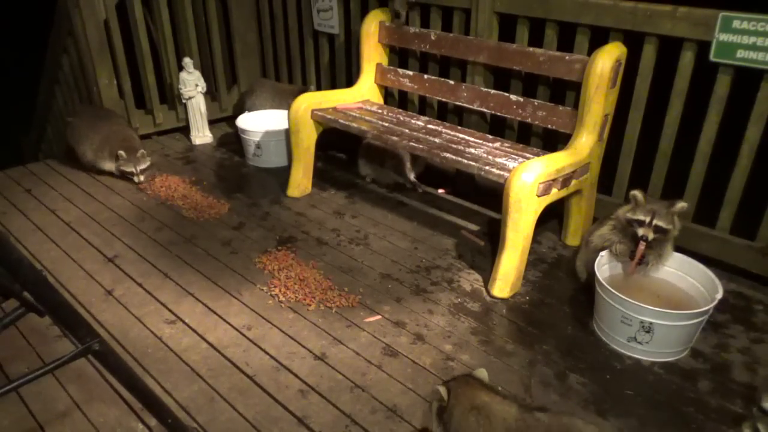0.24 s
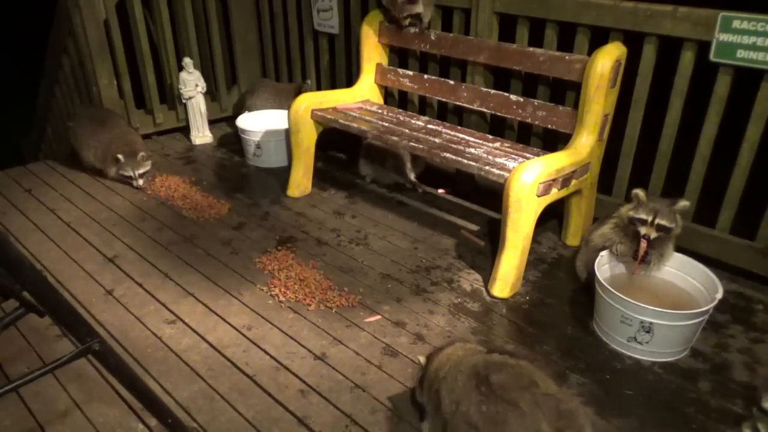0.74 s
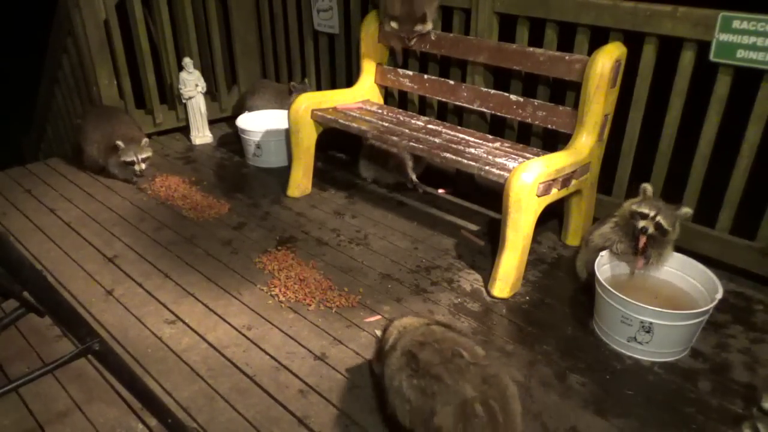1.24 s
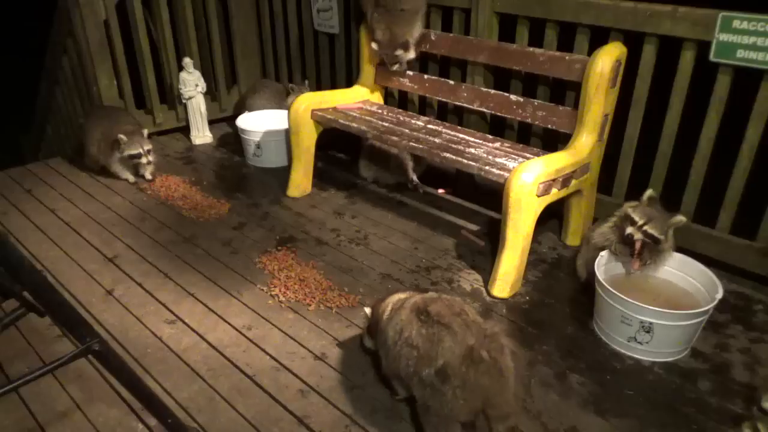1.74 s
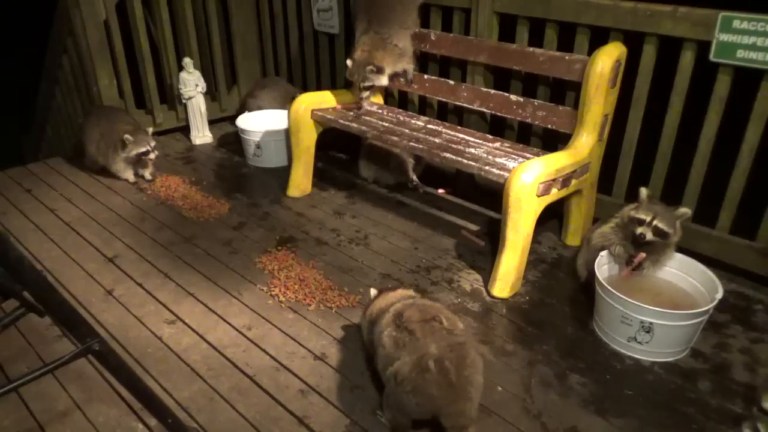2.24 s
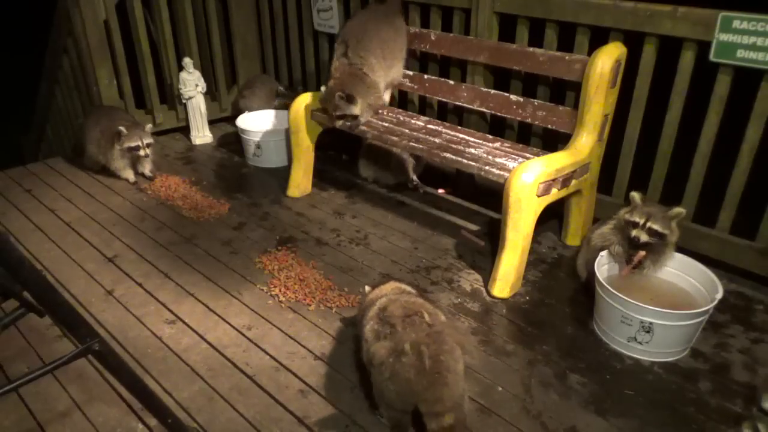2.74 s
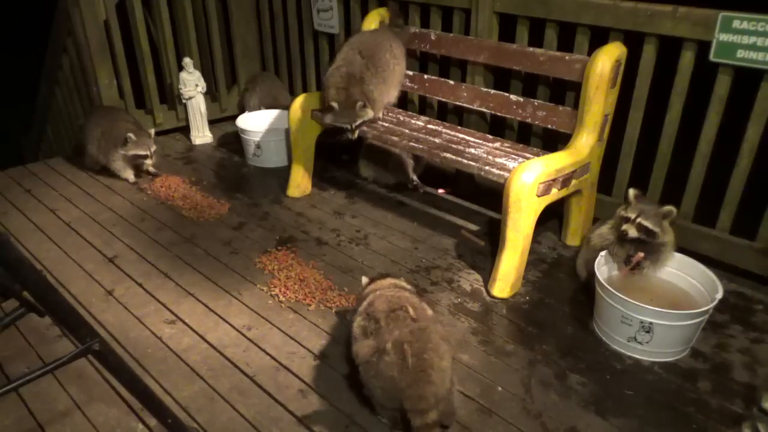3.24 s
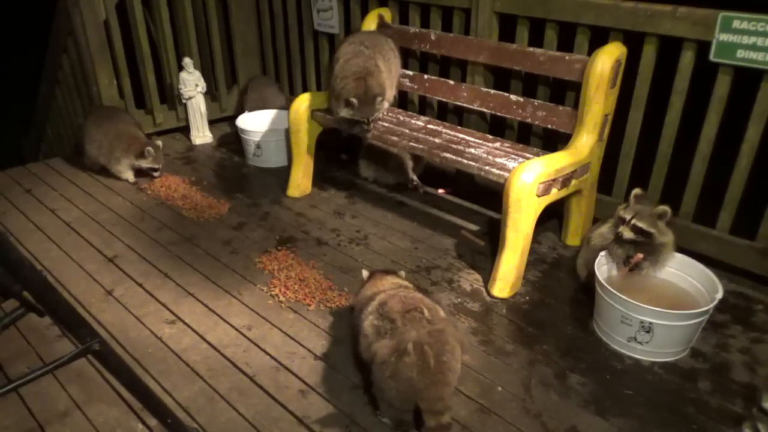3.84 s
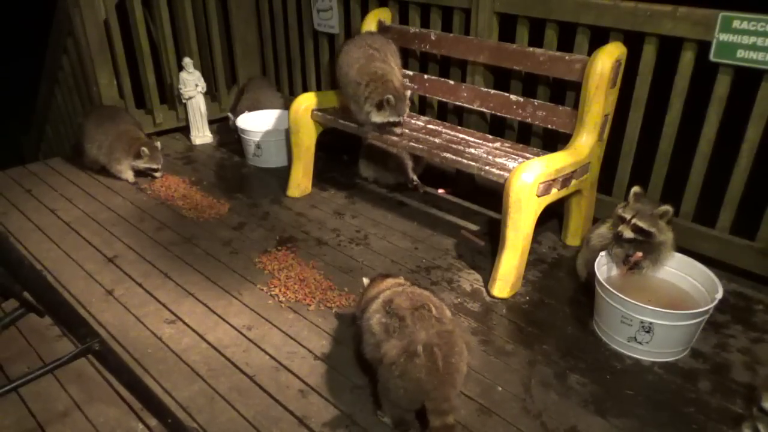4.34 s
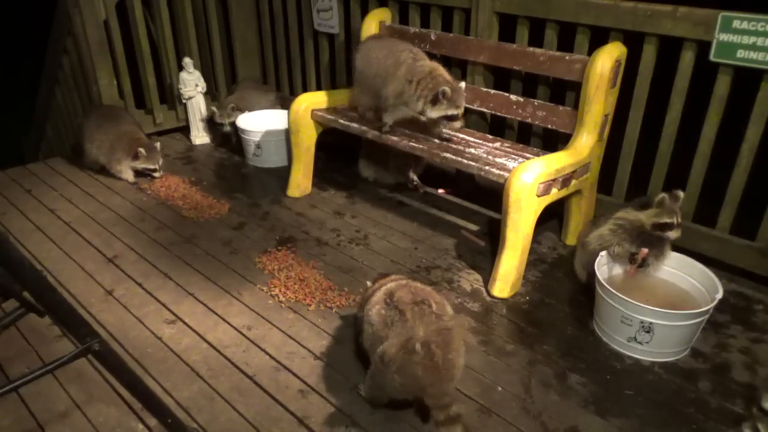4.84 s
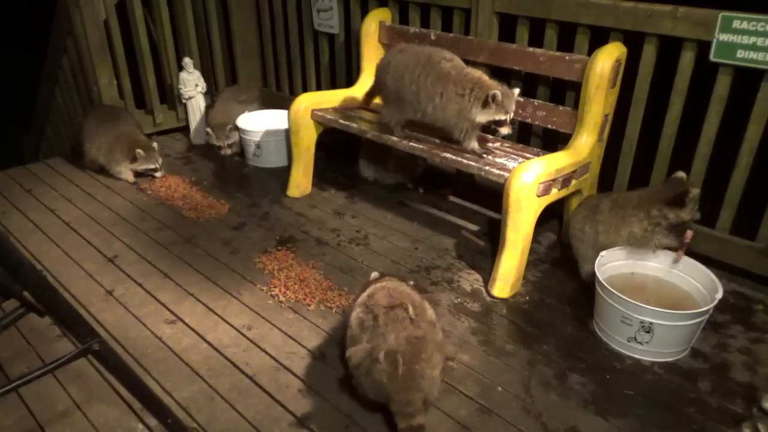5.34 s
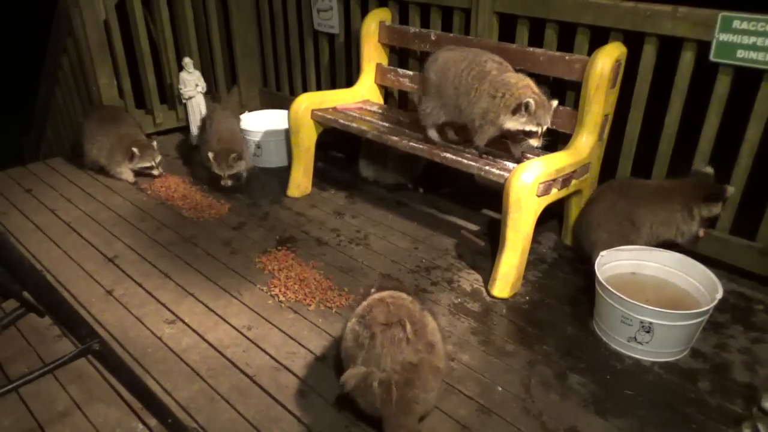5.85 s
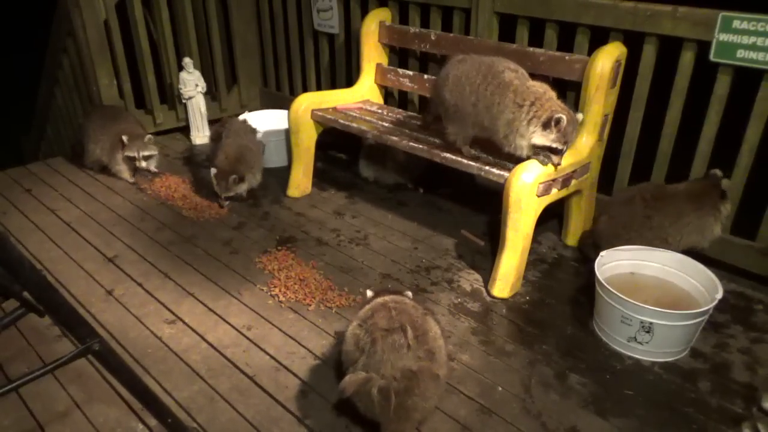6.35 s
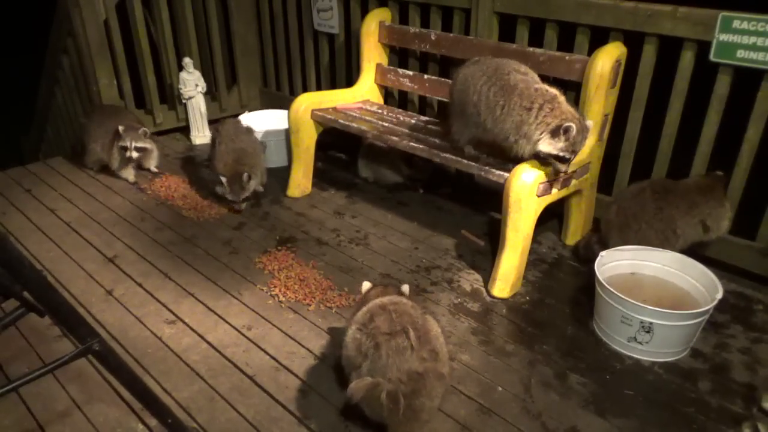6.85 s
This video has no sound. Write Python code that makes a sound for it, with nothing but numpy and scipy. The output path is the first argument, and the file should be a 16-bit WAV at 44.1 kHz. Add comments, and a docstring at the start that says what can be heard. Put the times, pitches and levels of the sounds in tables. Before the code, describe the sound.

A hard clattering burst, then sparse crisp pellet cracks, a woody thump and sliding claws, over soft animal rustling and quiet night hiss.

```python
"""A wooden deck at night: raccoons crack dry pellets close to two microphones.
Something rattles hard, a dense shower of impacts over a boom; pellets snap and ring, and blows ring the wood.
A paw slides down a bench by stick and slip, boards groan as wavering hum and noise, joists bounce softly,
chewing smacks and a few low knocks are soft puffs of noise, and slips squeak as stacks of overtones.
Behind it lie the rustle of many animals and the soft hiss of the night, both made of random spectra."""
import sys
import numpy as np
from scipy import signal
from scipy.fft import rfft, irfft
from scipy.io import wavfile
from scipy.ndimage import uniform_filter1d

SR = 44100
rng = np.random.default_rng(int(sys.argv[2]) if len(sys.argv) > 2 else 0)


def transcribe(signal):
    """Save signal, clipped to [-1, 1], as a 16-bit WAV file at the path in sys.argv[1]."""
    frames = np.atleast_2d(signal).T
    limited = np.clip(frames, -1, 1)
    pcm = np.round(limited * 32767).astype(np.int16)
    wavfile.write(sys.argv[1], SR, pcm)


N = 313110  # length of the scene in samples


def gain_of(db):
    """Turns decibels into an amplitude factor."""
    return 10 ** (np.asarray(db) / 20)


def evened(x):
    """Scales a sound to an RMS of 1."""
    return x / np.sqrt(np.mean(x ** 2) + 1e-20)


def peaked(x):
    """Scales a sound to a peak of 1."""
    return x / abs(x).max()


def smooth_noise(count, size):
    """Slow random drift with an RMS of 1: noise averaged over a window of size samples."""
    return evened(uniform_filter1d(rng.standard_normal(count), size=size))


def read(points, hz):
    """Reads a curve of (Hz, value) points along a logarithmic frequency axis."""
    f, value = np.transpose(points)
    return np.interp(np.log(hz + 1), np.log(f + 1), value)


def add(mix, s, sound):
    """Lays a sound into the mix from s seconds on, cut at the end of the scene."""
    part = mix[:, round(s * SR):][:, :sound.shape[-1]]
    part += sound[..., :part.shape[1]]


def panned(x, pan_db):
    """Places a sound so that left exceeds right by pan_db."""
    return x * gain_of([[pan_db / 2], [-pan_db / 2]])


def resonate(x, hz, width):
    """Shifts the curve hz down to zero, smooths, and shifts back: a resonance of gain 1."""
    turn = np.exp(2j * np.pi * np.cumsum(hz * np.ones(x.shape[-1])) / SR)
    r = np.exp(-np.pi * width / SR)
    smoothed = signal.lfilter([1 - r], [1, -r], x / turn + 1e-18)
    return 2 * (turn * smoothed).real


def resonate_twice(x, hz, width):
    """Two equal resonances in a row, for steeper flanks, evened."""
    return evened(resonate(resonate(x, hz, width), hz, width))


# How alike the two microphones hear the deck.
# Each row: frequency in Hz, left-right likeness from 0 to 1.
LIKENESS = [(60, 0.95), (170, 0.98), (490, 0.59), (1410, 0.63), (4060, 0.84), (11600, 0.8)]
# How the deck leans between the microphones. Each row: frequency in Hz, left over right in dB.
LEAN = [(60, 0.13), (170, 0.0), (490, 0.68), (1410, 1.4), (4060, 1.2), (11600, 0)]


def spread(left, other, hz, likeness, lean):
    """Gives the right spectrum a partly unrelated copy of the left, then leans the pair."""
    same = np.clip(read(likeness, hz), -1, 1)
    right = same * left + np.sqrt(1 - same ** 2) * other
    half_db = read(lean, hz) / 2
    return np.array([left * gain_of(half_db), right * gain_of(-half_db)])


def pair(left, other, colour, likeness=LIKENESS, lean=LEAN, tilt_db=0):
    """Colours a sound, tilts it by tilt_db per octave and spreads it over both microphones."""
    hz = np.fft.rfftfreq(len(left), 1 / SR)
    both = spread(rfft(left), rfft(other), hz, likeness, lean)
    colour_db = read(colour, hz) + tilt_db * np.log2((hz + 500) / 3000)
    return evened(irfft(both * gain_of(colour_db), len(left)))


def grit(count, per_s, spread_db):
    """Two unrelated trains of clicks of very uneven size."""
    size = gain_of(spread_db * np.minimum(rng.exponential(1, (2, count)), 5))
    falls = rng.random((2, count)) < per_s / SR
    return size * rng.standard_normal((2, count)) * falls


def field(colour, level_db, tilt_db, patchy_db, flicker_db):
    """Random short-time spectra with drifting patches and a flicker shared by all pitches."""
    frames, hz = N // 128 + 5, np.fft.rfftfreq(512, 1 / SR)
    a, b, c, d, patches = rng.standard_normal((5, frames, 257))
    patches = uniform_filter1d(patches, size=7, axis=1)  # across pitch
    patches = evened(uniform_filter1d(patches, size=24, axis=0))  # along time
    flicker = smooth_noise(frames, 12)[:, None]
    z = spread(a + 1j * b, c + 1j * d, hz, LIKENESS, LEAN) * gain_of(read(colour, hz))
    z /= np.sqrt(np.mean(abs(z) ** 2) * 257 / 3)
    t = np.arange(frames)[:, None] * 128 / SR
    octaves = np.log2((hz + 100) / 2500)
    z *= gain_of(level_db(t) + tilt_db(t) * octaves + patchy_db * patches + flicker_db * flicker)
    return signal.istft(z.transpose(0, 2, 1), nperseg=512, noverlap=384)[1][:, :N]


# Bursts of the hard rattle. Each row: start in seconds, starting level of the shower in dB,
# brightness in dB per octave, ring in Hz, time to fall 60 dB in seconds (below the treble).
RATTLE_BURSTS = [(0.0878, -22, 1, 9410, 0.046), (0.092, -23.5, 1, 5400, 0.23), (0.102, -27, -2, 1110, 0.22),
                 (0.112, -29.5, -3, 682, 0.23), (0.156, -28, -2, 1170, 0.31),
                 (0.1597, -24.5, 1, 1520, 0.15), (0.168, -25.5, -4.5, 1820, 0.28),
                 (0.177, -20.5, -3, 699, 0.15), (0.2034, -21.5, -1.5, 2530, 0.11),
                 (0.213, -27, -3, 1110, 0.16), (0.234, -25, -1.5, 6660, .1), (0.244, -39, -1, 3410, 0.065),
                 (0.293, -39, -5.5, 596, 0.12)]
# Tone colour of the shower before brightness. Each row: frequency in Hz, level in dB per Hz.
RATTLE_COLOUR = [(120, -7.5), (200, -11.5), (350, -9), (508, -16.5), (701, -3.5), (859, -11), (1150, -9.5),
                 (3200, -8), (5740, -16), (8920, -14.5), (10900, -20.5), (11500, -41)]
# Where the rattle leans. Each row: frequency in Hz, left over right in dB.
RATTLE_LEAN = [(60, -2), (170, 1), (490, 6.5), (1410, 4.5), (4060, 3), (11600, -1)]
# How alike the microphones hear it. Each row: frequency in Hz, left-right likeness from 0 to 1.
RATTLE_LIKENESS = [(60, 0.96), (170, 0.97), (490, 0.88), (1410, 0.45), (4060, 0.43), (11600, 0.75)]
TREBLE_FROM_HZ, TREBLE_SHARE = 8500, 0.85  # the treble dies in this share of the time
BOOM_DB, BOOM_T60_S = -16.5, 0.57  # the boom is set relative to the burst


def rattle(s, db, tilt_db, hz, t60):
    """A dense shower of small impacts that dies away, treble first, with the boards booming under it."""
    t = np.arange(SR // 2) / SR
    impacts = grit(len(t), 11000, spread_db=0.4)
    shower = pair(*impacts, RATTLE_COLOUR, RATTLE_LIKENESS, RATTLE_LEAN, tilt_db)
    clumps_db = 2.5 * np.tanh(smooth_noise(len(t), 90))  # impacts come in clumps
    shower = shower * gain_of(clumps_db)

    body = signal.lfilter(*signal.butter(1, TREBLE_FROM_HZ, fs=SR), shower)
    treble = 1.16 * (shower - body)
    fading = body * gain_of(-60 * t / t60) + treble * gain_of(-60 * t / (TREBLE_SHARE * t60))

    width = 150 + 0.019 * hz  # wider rings die sooner
    struck = panned(np.sin(2 * np.pi * hz * t), read(RATTLE_LEAN, hz))
    ring = (evened(resonate(shower, hz, width)) + 1.5 * struck) * gain_of(-60 * t * width / 14)
    hits = (fading + 0.5 * ring) * (1 - np.exp(-t / 0.00015))

    boom = evened(resonate(rng.standard_normal(len(t)), 76, 150))
    boom = boom * gain_of(BOOM_DB - 60 * t / BOOM_T60_S) * (1 - np.exp(-t / 0.0042))
    return s, gain_of(db) * (hits + boom)


# Pellets cracking and claws ticking. Each row: start in seconds, level in dB, ring in Hz,
# crumbling after the snap in relative dB.
CRACKS = [(0.65, -42.5, 2270, -22), (0.774, -39, 5000, 0), (1.085, -42, 4590, -2),
          (1.1231, -37.5, 3880, -6), (1.6148, -37, 5300, -1), (1.6338, -32, 2070, -4),
          (1.6344, -29, 9500, -2), (1.742, -35.5, 8940, 0), (2.121, -31, 3670, 5.5),
          (2.1353, -22, 6500, -4.5), (2.245, -24, 3650, -2.5), (2.247, -28, 6450, -13),
          (2.5502, -36, 5500, -9), (2.5788, -28, 8420, -1.5), (2.803, -44.5, 2850, 5),
          (2.819, -37.5, 3340, 2.5), (2.8422, -38.5, 3100, 2.5), (2.866, -31.5, 3060, -6),
          (2.866, -31.5, 6430, -10), (2.8762, -30, 3350, -6), (2.9004, -34, 5330, -3),
          (3.1376, -39.5, 3400, 4), (3.158, -37.5, 3140, -1), (3.1812, -33.5, 5460, -5.5),
          (3.4411, -30.5, 5000, -4), (3.466, -38, 3240, -3), (4.0435, -42, 5000, 2), (4.0616, -40, 3100, 3),
          (4.312, -43.5, 3070, 2.5), (4.4838, -40, 3500, -12), (4.487, -35.5, 2080, -6.5),
          (4.483, -46, 7500, -15), (5.039, -39, 4060, -1), (5.292, -30, 7460, -8), (5.294, -31, 8820, -3.5),
          (5.415, -39.5, 1480, -1), (5.683, -43, 2280, 8), (5.814, -46.5, 2700, 7), (5.919, -35, 4200, -8),
          (5.989, -40, 9300, 1.5), (6.1718, -39, 8500, 3), (6.177, -37, 3250, 2), (6.211, -40.5, 2600, -3),
          (6.401, -32.5, 6660, -3), (6.467, -25, 4150, -7), (6.469, -33, 2580, -2), (6.7669, -31, 2900, -6),
          (6.797, -36.5, 2800, -6), (6.799, -31, 5470, -3), (6.82, -43, 6200, -12),
          (7.0717, -30.5, 2800, -0.5)]
# Tone colour of the splinters before the tilt. Each row: frequency in Hz, level in dB per Hz.
CRACK_COLOUR = [(710, -29), (1200, 1.5), (2040, -0.5), (2350, 4), (4910, 0), (6460, 2.5), (10200, -2),
                (11500, -17)]
# Where the splinters lean. Each row: frequency in Hz, left over right in dB.
CRACK_LEAN = [(500, 9), (3000, 1), (6000, 2), (10000, 1.5)]
BRIGHTER_DB = 1.5  # a crack that rings an octave higher tilts this many more dB per octave to the treble
SNAP_S = .0003  # time to the top of the snap
CRACK_BODY_HZ = 2840  # every crack also rings here, and at two and three times this, for a moment
WOOD_UNDER_DB = -26


def crack(s, db, hz, crumble_db):
    """A sharp snap rings the pellet; splinters and echoes off the boards follow, with wood beneath."""
    t = np.arange(SR // 4) / SR
    tilt_db = BRIGHTER_DB * np.log2(hz / 3500)
    clicks = grit(len(t), 8000, spread_db=1.0)
    splinters = pair(*clicks, CRACK_COLOUR, LIKENESS, CRACK_LEAN, tilt_db)
    near = evened(.8 * splinters + resonate(splinters, hz, 1800))  # gathered around the ring
    ring = resonate_twice(splinters, hz, 620) * gain_of(-60 * t / 0.057)

    tone = np.sin(2 * np.pi * hz * t)
    ping = tone + 0.35 * sum(np.sin(2 * np.pi * k * CRACK_BODY_HZ * t) for k in range(1, 4))
    swing = (t / SNAP_S) ** 2 * np.exp(2 - 2 * t / SNAP_S)  # only a few swings
    snap = .55 * ping * swing
    snap = snap + .13 * near * gain_of(-60 * t / .015) + .32 * tone * gain_of(-60 * t / .028)

    echoes = gain_of(crumble_db) * (1 - np.exp(-(t / 0.003) ** 2)) * gain_of(-60 * t / 0.15)
    wood = resonate_twice(rng.standard_normal(len(t)), 650, 1200)
    wood = wood * gain_of(WOOD_UNDER_DB - 60 * t / 0.15)
    body = snap + 0.02 * ring + 0.28 * near * echoes + wood
    return s, gain_of(db) * body * np.minimum(t / .0001, 1)


# Paws landing on wood. Each row: start in seconds, peak in dB before panning,
# pitch where the wood rings most in Hz.
KNOCKS = [(0.65, -44, 1140), (1.121, -45.5, 1570), (1.228, -42, 234), (1.613, -31.5, 920),
          (1.62, -34, 1130), (1.634, -27.5, 920), (1.635, -19.5, 325), (1.742, -33, 300),
          (1.742, -40.5, 950), (2.042, -30, 182), (2.08, -45, 174), (2.136, -36, 840), (2.247, -35, 790),
          (2.581, -47.5, 610), (3.181, -41, 650), (3.445, -44, 650), (4.488, -39, 1120), (5.133, -47, 1100),
          (5.417, -48, 370), (5.419, -41.5, 172.5), (6.177, -44.5, 730), (6.21, -41.5, 600),
          (6.516, -41.5, 1240), (6.71, -49, 547)]
# Ringing modes of the wood. Each row: pitch in Hz, relative level in dB,
# time to fall 60 dB in seconds (held to at most 0.35).
WOOD_MODES = [(156.4, 1.5, 0.4), (193.7, 2.5, 0.21), (348.3, 1, 0.16), (375, -2.5, 0.13), (410, -7, 0.27),
              (473.4, 0, 0.2), (610, -4, 0.1), (745, 3, 0.027), (940, -6.5, 0.05), (1074, 5, 0.023),
              (1218, -0.5, 0.05)]


def knock(s, db, hz):
    """A blunt blow rings the modes of the wood, most of all those near the struck spot's pitch."""
    t = np.arange(SR // 2) / SR
    f, mode_db, t60 = np.transpose(WOOD_MODES)[:, :, None]
    near_db = -10. * abs(np.log2(f / hz))
    decay_db = -60 * t / np.clip(t60, .015, .35)
    sign = (-1.) ** np.arange(len(WOOD_MODES))[:, None]  # neighbouring modes start in opposite directions
    modes = sign * gain_of(mode_db + near_db + decay_db) * np.sin(2 * np.pi * f * t)
    modes = peaked(modes.sum(axis=0))
    # many weak modes crowd around the struck pitch and blur the ring
    crowd_t60 = 0.32 * (330 / hz) ** 0.37
    crowd = resonate_twice(rng.standard_normal(len(t)), hz, 410) * gain_of(-60 * t / crowd_t60)
    thud = np.sin(2 * np.pi * hz * t) * gain_of(-60 * t * hz / 30)  # falls 60 dB in 30 swings
    attack = 1 - np.exp(-t * hz / 0.3)  # low boards take the blow more slowly
    blow = (modes + 0.18 * crowd + 0.8 * thud) * attack
    no_bass = signal.butter(2, 90, "high", fs=SR, output="sos")  # slats radiate no deep bass
    blow = signal.sosfilt(no_bass, blow)
    return s, panned(gain_of(db) * peaked(blow), 1.5)


# Resonances of the slat under the sliding paw.
# Each row: middle pitch in Hz, width of each filter pass in Hz, relative level in dB.
SLIDE_RINGS = [(1360, 1320, 8), (2090, 59, 1), (3814, 160, 4.5), (4250, 730, 7), (5830, 380, 3.5),
               (6100, 600, -2), (8270, 690, 3.5), (5000, 1300, 1.5)]
# the paw grips, presses harder as it goes, then lifts off
SLIDE_S, SLIDE_LENGTH_S, SLIDE_DB, SLIDE_SWELL_DB_PER_S = 1.75, .53, -48, 8.5
GRIP_S, LIFT_S = 0.04, 0.15
SLIDE_RISE = 0.018  # the resonances climb by this share as the paw travels
WANDER = .022  # share by which the contact wanders along the slat (RMS)


def slide():
    """Rapid stick and slip of claws excites the resonances of the slat, each coming and going."""
    t = np.arange(0, SLIDE_LENGTH_S, 1 / SR)
    # colour of the slips: (Hz, dB per Hz)
    slips = pair(*grit(len(t), 9000, spread_db=1.0), [(600, -34), (1200, 0), (12000, 10)])
    rings = 0
    for hz, width, ring_db in SLIDE_RINGS:
        waver = smooth_noise(len(t), 2500)
        drift = smooth_noise(len(t), 2500)
        path = hz * (1 + WANDER * drift + SLIDE_RISE * (t / SLIDE_LENGTH_S - .5))
        rings += gain_of(ring_db + 1.2 * waver) * resonate_twice(slips, path, width)
    contact = np.minimum(t / GRIP_S, 1) * np.minimum((SLIDE_LENGTH_S - t) / LIFT_S, 1)
    swell = gain_of(SLIDE_DB + SLIDE_SWELL_DB_PER_S * t)
    return SLIDE_S, swell * contact * evened(rings)


# Boards groaning under shifting weight. Each row: start in seconds, length in seconds, level in dB,
# first pitch in Hz, last pitch in Hz, looseness from 0 (hum) to 1 (noise).
GROANS = [(1.681, 0.46, -46.5, 306, 219.3, 0.68), (1.997, 0.25, -44, 187.5, 224.6, 0.4),
          (3.6, 0.17, -60.5, 337, 370, 0.8), (3.748, 0.2, -59.5, 874, 834, 0.76),
          (3.82, 0.18, -64, 1250, 1220, 1), (3.774, 0.23, -57, 372.7, 426, 0.4),
          (3.985, 0.17, -56, 387.7, 424, 0.5), (3.988, 0.2, -63.5, 1267, 1300, 0.9),
          (4.029, 0.23, -60.5, 747, 648, 0.9), (4.05, 0.21, -56.5, 154, 142, 0),
          (4.48, 0.055, -57, 790, 1100, 0.8), (5.41, 0.12, -47, 164.5, 148, 0.1),
          (5.55, 0.11, -56.5, 153, 160, 0.4), (5.692, 0.13, -58, 178, 189, 0.23),
          (5.866, 0.057, -59, 454, 378, 0.4)]
LOAD_SHARE = 0.36  # share of a groan spent loading the board; the rest is release


def groan(s, length, db, first_hz, last_hz, looseness):
    """A wavering hum and noise in a board resonance that shifts as the load moves, swelling and letting go."""
    u = np.arange(0, length, 1 / SR) / length
    hz = first_hz + (last_hz - first_hz) * u
    push = rng.standard_normal(len(u))
    loose = resonate_twice(push, hz, 300)
    wobble = smooth_noise(SR // 2, 700)[:len(u)]
    hum = np.sin(2 * np.pi * np.cumsum(hz * (1 + .04 * wobble)) / SR)
    tight = evened(hum) * gain_of(2.5 * wobble[::-1])
    share = np.clip(looseness, 0, 1)
    board = np.sqrt(1 - share) * tight + np.sqrt(share) * loose
    catch = smooth_noise(SR // 2, 500)[:len(u)]  # the joint catches and slips
    load = np.minimum(u / LOAD_SHARE, (1 - u) / (1 - LOAD_SHARE))
    return s, gain_of(db + 2.7 * share * catch) * board * np.sin(np.pi / 2 * load)


# The whole deck bouncing under a heavy step. Each row: start in seconds, level in dB, pitch in Hz.
BOUNCES = [(2.062, -40.5, 129), (5.283, -48, 52.6), (5.43, -48.5, 132), (6.007, -49, 81.6)]


def bounce(s, db, hz):
    """A soft, deep swing of the joists: a sine that builds in milliseconds and dies away."""
    t = np.arange(SR // 2) / SR
    return s, gain_of(db - 60 * t / 0.28) * np.sin(2 * np.pi * hz * t) * (1 - np.exp(-t / 0.0092))


# Tone colour of the rustle and of the air in the soft puffs, before any tilt or resonance.
# Each row: frequency in Hz, level in dB per Hz.
RUSTLE_COLOUR = [(180, -12), (300, -6), (773, -5), (1630, -6), (4750, -1), (7170, -7.5), (8740, -5),
                 (11000, -20.5)]
# Short soft puffs of noise: chewing smacks, and at 3.562 and 4.462 s soft, low knocks.
# Each row: start in seconds, peak in dB, pitch in Hz.
SOFT_PUFFS = [(0.838, -48.5, 2690), (1.429, -47, 3160), (1.964, -41, 1380), (2.51, -48, 2550),
              (2.737, -46, 2530), (3.562, -41, 594), (4.442, -49, 1240), (4.462, -43.5, 495),
              (4.546, -46.5, 1640), (5.106, -46, 2620), (5.5466, -47.5, 4540), (6.301, -45.5, 1280),
              (6.65, -51, 3540), (6.732, -50, 2770), (6.95, -46, 2670), (7.0171, -45, 2570)]


def soft_puff(s, db, hz, length=0.037):
    """A brief swell of noise in a narrow resonance, within a wider one."""
    t = np.arange(0, 3 * length, 1 / SR)
    air = pair(*rng.standard_normal((2, 8000)), RUSTLE_COLOUR)[:, :len(t)]
    wide = evened(resonate(air, hz, min(hz, 2500)))
    puff = resonate_twice(air, hz, 400) + .9 * wide
    return s, gain_of(db) * peaked(puff * t * np.exp(-3 * t / length))


# Brief squeaks, perhaps wet paws rubbing. Each row: start in seconds, length in seconds, level in dB,
# pitch in Hz, frequency of the strongest overtones in Hz.
SQUEAKS = [(3.006, .045, -54.5, 448, 2160), (5.17, 0.055, -59, 550, 1900)]


def squeak(s, length, db, hz, strongest_hz):
    """A short, nearly regular train of slips: a stack of overtones that swells and stops."""
    t = np.arange(0, length, 1 / SR)
    turns = np.cumsum(hz * (1 + .01 * smooth_noise(len(t), 200))) / SR
    k = np.arange(1, 10)[:, None]
    overtone_gain = gain_of(-12. * np.log2(k * hz / strongest_hz) ** 2)
    stack = overtone_gain * np.cos(2 * np.pi * (k * turns + rng.random(k.shape)))
    return s, gain_of(db) * evened(stack.sum(axis=0)) * np.sin(np.pi * t / length)


# Fur, paws and chewing of the whole group. Each row: time in seconds, level of the shuffle in dB.
RUSTLE_LEVEL = [(0, -59), (.25, -53), (.55, -56.5), (1.0, -59), (1.3, -56.5), (1.6, -57.5), (2.3, -55),
                (2.7, -57), (3.3, -57.5), (3.9, -56.5), (4.3, -57.5), (4.6, -57.5), (5.4, -57), (5.75, -54),
                (6.35, -56.5), (6.9, -58.5), (7.1, -55)]
CALM_DB, CALM_TILT_DB, TILT_PER_DB = -62.5, -3, 0.0429  # a livelier rustle is brighter (tilt: dB per octave)


def rustle():
    """A restless, patchy shuffle with small ticks scattered in it."""
    def level_db(t):
        return np.interp(t, *np.transpose(RUSTLE_LEVEL))

    def tilt_db(t):
        return CALM_TILT_DB + TILT_PER_DB * (level_db(t) - CALM_DB)

    shuffle = field(RUSTLE_COLOUR, level_db, tilt_db, patchy_db=2.0, flicker_db=1.1)
    return shuffle + 0.5 * ticks() * gain_of(level_db(np.arange(N) / SR))


def ticks():
    """Far teeth and claws: sparse tiny clicks, each ringing briefly in its own part of the treble."""
    t, out = np.arange(1200) / SR, 0
    for hz in np.geomspace(1300, 9500, num=8):
        tick = resonate(rng.standard_normal((2, len(t))), hz, .4 * hz) * gain_of(-60 * t / .045)
        tick = tick / np.linalg.norm(tick)
        clicks = grit(N, 12, spread_db=2.)[:1]
        out += signal.fftconvolve(clicks, tick, axes=1)[:, :N]
    return evened(out)


# Tone colour of the night air. Each row: frequency in Hz, level in dB per Hz.
NIGHT_COLOUR = [(12, -32), (20, -6), (53, -6), (113, 0), (243, 4.5), (849, -16), (1110, -1.5), (1990, -14),
                (4910, -9), (9300, -11), (10600, -13.5), (11500, -31)]
NIGHT_DB = -62.5


def night():
    """The steady hiss and low wash of the air."""
    return field(NIGHT_COLOUR, lambda t: NIGHT_DB, lambda t: 0, patchy_db=1.2, flicker_db=.4)


def scene():
    """Lays every event over the rustle and the night."""
    mix = night() + rustle()
    sources = ((rattle, RATTLE_BURSTS), (crack, CRACKS), (knock, KNOCKS), (groan, GROANS),
               (bounce, BOUNCES), (soft_puff, SOFT_PUFFS), (squeak, SQUEAKS))
    for source, rows in sources:
        for row in rows:
            add(mix, *source(*row))
    add(mix, *slide())
    return mix


EDGE_HZ = 11150  # upper band limit


def record(dry):
    """The microphones lose the deepest bass; then the band limit."""
    dry = signal.sosfilt(signal.butter(2, 18, "high", fs=SR, output="sos"), dry)
    band_limit = signal.firwin(301, EDGE_HZ, window=("kaiser", 9), fs=SR)
    return signal.oaconvolve(dry, band_limit[None], "same")


dry = scene()
out = record(dry)
transcribe(out)
```